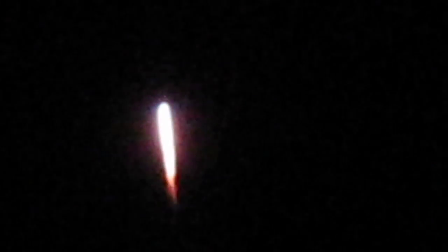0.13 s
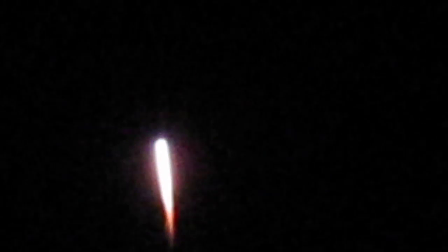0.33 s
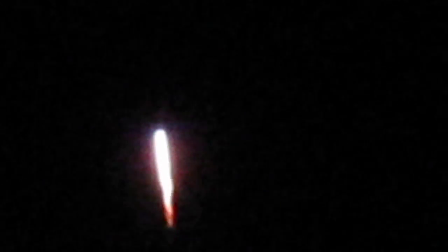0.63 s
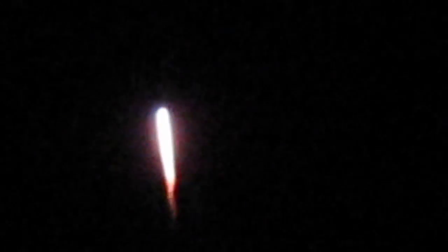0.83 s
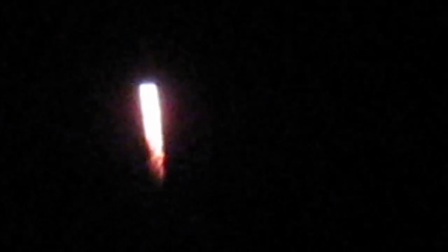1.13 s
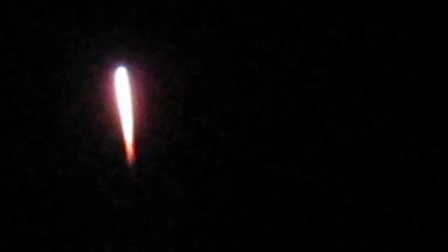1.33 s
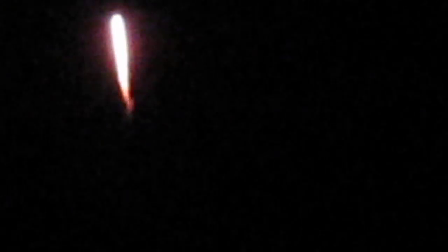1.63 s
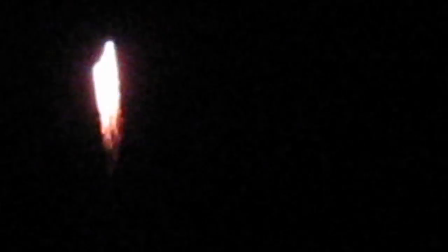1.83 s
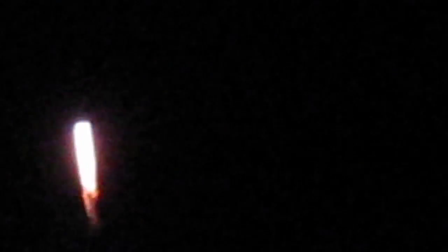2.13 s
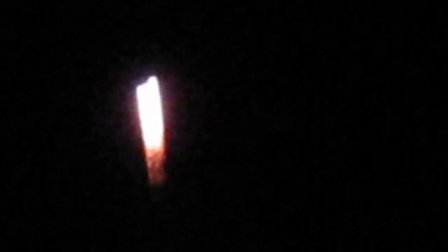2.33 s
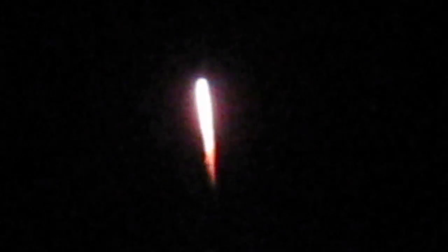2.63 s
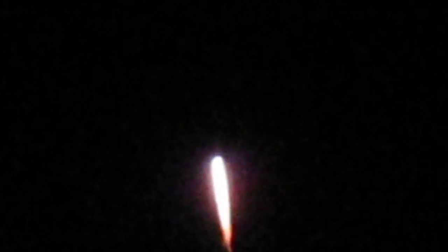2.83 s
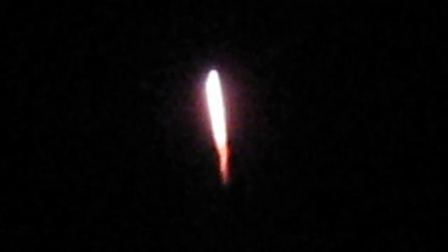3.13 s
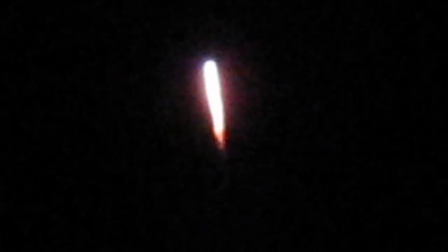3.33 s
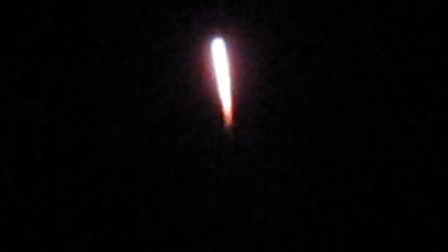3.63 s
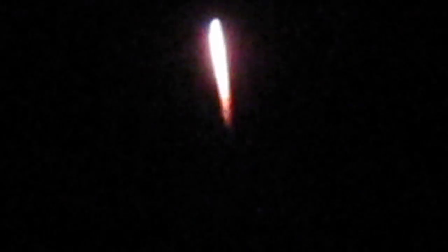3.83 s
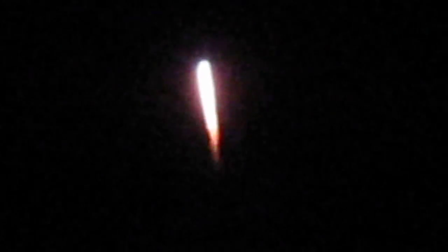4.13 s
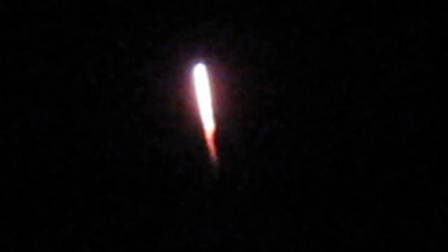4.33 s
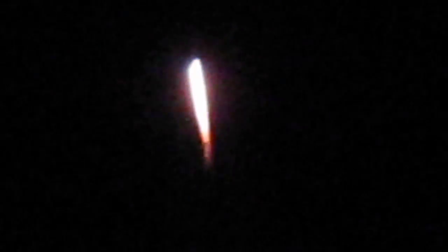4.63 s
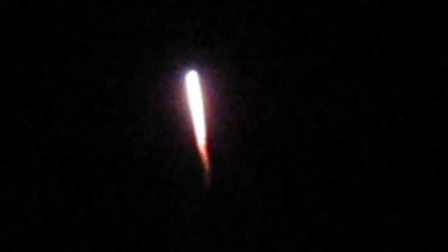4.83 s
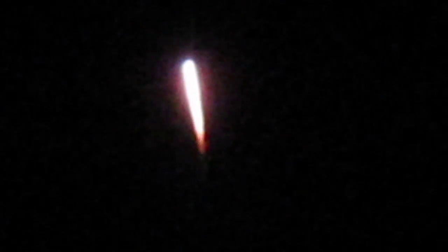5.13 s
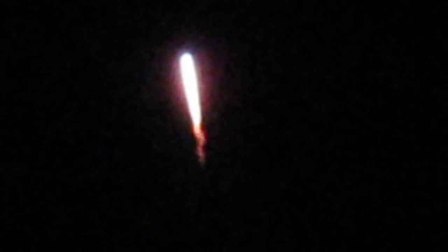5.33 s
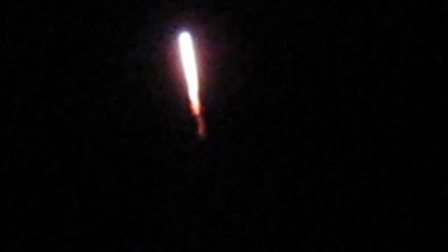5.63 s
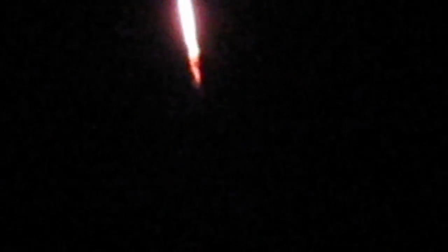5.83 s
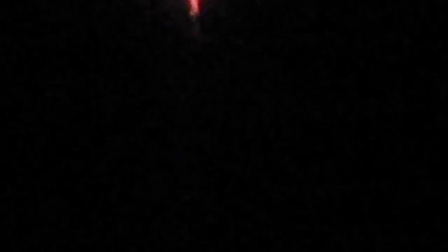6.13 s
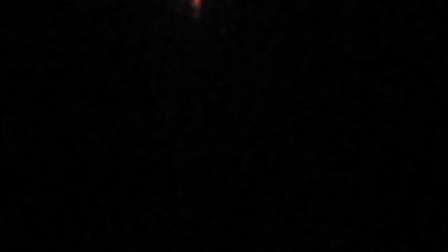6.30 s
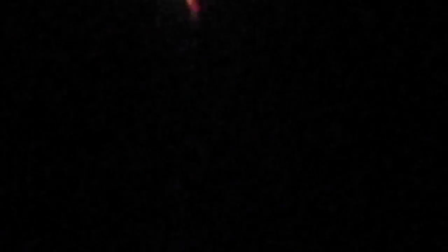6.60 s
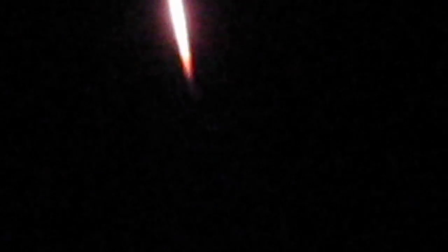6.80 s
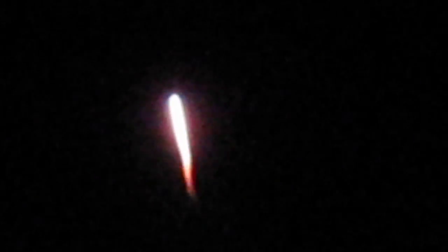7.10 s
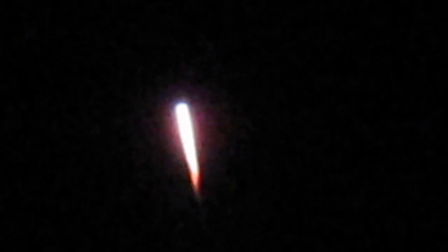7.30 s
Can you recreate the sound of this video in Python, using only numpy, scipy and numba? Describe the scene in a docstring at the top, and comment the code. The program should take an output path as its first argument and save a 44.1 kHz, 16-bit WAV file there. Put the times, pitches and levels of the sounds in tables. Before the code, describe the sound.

Distant rocket roar at night, starting as a low rumble, swelling into harsh, crackling, overloaded fluttering with hard cracks, then easing back to rumble.

```python
"""A far rocket climbs at night. At first a distant exhaust roar is heard with faint hiss, whine and soft rustles.
From 0.6 s surges of the swelling roar pin a small camera's input at its rails: the sound stalls for ms at a time.
From 1 s hard shock cracks join in; the roar is strongest near 3.4 s, and the last listed surge comes at 6.6 s.
The roar is shaped noise with listed surges and cracks; gain control and filters follow the overloaded input."""
import sys
import numpy as np
from scipy import signal
from scipy.fft import rfft, irfft, next_fast_len
from scipy.io import wavfile
from scipy.ndimage import uniform_filter1d
from numba import njit

SR = 44100
rng = np.random.default_rng(int(sys.argv[2]) if len(sys.argv) > 2 else 0)


def dump(signal):
    """Clip the signal to [-1, 1] and save it as 16-bit WAV at the path in sys.argv[1]."""
    limited = np.clip(np.atleast_2d(signal).T, -1, 1)
    pcm = np.round(limited * 32767).astype(np.int16)
    wavfile.write(sys.argv[1], SR, pcm)


N = 328986
T_S = np.arange(N) / SR

# Levels are dB re one rail at the input; a colour gives relative spectral density, scaled to rms 1 in noise().
# deep roar: t/s, level/dB
DEEP_LEVEL = [(0, -12.5), (0.6, -6.5), (1.199, -5.5), (1.45, -5), (1.8, -1), (2.1, -1), (2.602, 0.5),
              (3.4, 3), (3.9, 2.5), (4.3, 1.5), (4.8, 0), (5.101, -4), (5.6, -6), (5.9, -6), (6.25, -7),
              (6.45, -6), (6.9, -5.5), (7.46, 0)]
# colours of the three parts of the roar: f/Hz, level/dB (per Hz)
DEEP_COLOUR = [(8, -31.5), (14, -11.5), (22, -2.5), (32, 0.5), (45, -1.5), (64, -4), (85, -16), (120, -25)]
BODY_COLOUR = [(50, -28.5), (75, -3), (95, -1.5), (118, 4), (140, 1.5), (165, -0.5), (200, -1), (245, -11),
               (300, -45)]
UPPER_COLOUR = [(200, -35.5), (260, 1), (315, 3.5), (400, -3.5), (520, -5), (580, -18), (780, -20),
                (850, -29.5), (1100, -32.5), (1500, -55.5), (2200, -69.5)]
# fine shock crackle of the plume: t/s, level/dB
CRACKLE_LEVEL = [(0, -64.5), (1.2, -53), (1.8, -42), (2.6, -40), (3.9, -39), (4.6, -42), (5.15, -49.5),
                 (5.701, -53.5), (6.399, -61), (7.46, -62)]
# its colour, and that of the faint hiss of the night: f/Hz, level/dB (per Hz)
CRACKLE_COLOUR = [(400, -22), (700, -4.5), (1100, 1), (2000, -16), (4000, -25.5), (8000, -40),
                  (16000, -72.5)]
HISS_COLOUR = [(900, -35), (1500, -22.5), (2160, -13.5), (2800, -13), (3700, -13.5), (4600, -19.5),
               (5400, -20), (6300, -29), (12000, -33), (16000, -53)]
# thin fluttering bands in the night air: f/Hz, offset/Hz at which they are 30 dB down, relative level/dB
WHINE_BANDS = [(2830, 220, 2), (5460, 450, -11)]
# short soft rustles close by: t/s, time/s from the peak to 35 dB below it, level/dB
RUSTLES = [(0.004, 0.0098, -48), (0.096, 0.14, -67.5), (.24, 0.054, -64), (.37, 0.052, -65),
           (0.551, 0.029, -55), (0.727, 0.11, -58), (5.73, 0.19, -59.5), (5.86, 0.093, -62),
           (6.183, 0.11, -55.5), (6.841, 0.061, -57.5), (7.265, 0.069, -65.5)]
# their colour, with two narrow rings: f/Hz, level/dB (per Hz)
RUSTLE_COLOUR = [(1500, -19.5), (2500, -7.5), (2820, -3), (3100, -9.5), (5000, -16.5), (5500, -12.5),
                 (5900, -18), (12000, -28.5)]
# clearest pressure surges: start t/s, time at the rail/ms, steepness/(rails per ms) before edge scaling;
# a negative steepness marks the lower rail
SURGES = [(0.5943, 1.3, -0.55), (0.8377, 2.9, -0.75), (0.962, 3.6, -0.45), (0.9815, 0.9, 0.45),
          (1.0481, 3.0, -0.7), (1.1287, 2.7, -0.7), (1.1899, 1.6, 0.65), (1.3188, 3.9, 0.9),
          (1.3521, 1.7, 0.5), (1.3645, 1.0, -0.8), (1.4202, 1.4, -1.2), (1.4362, 1.4, -1.05),
          (1.4476, 3.3, 0.8), (1.4979, 7.0, 1.7), (1.5133, 7.4, -0.8), (1.538, 8.6, 0.5),
          (1.569, 2.4, -1.7), (1.6503, 5.9, 0.5), (1.6658, 2.9, -1.95), (1.7069, 3.6, -1.6),
          (1.7487, 8.0, -0.85), (1.7589, 2.8, 1.45), (1.7894, 7.6, 0.65), (1.8093, 13.7, -0.9),
          (1.861, 10.1, -2.6), (1.9529, 4.7, 1.05), (1.9608, 2.7, -2.4), (1.9654, 2.8, -1.55),
          (1.9861, 6.6, 2.5), (2.1003, 4.7, 0.85), (2.1227, 3.5, -1.85), (2.1703, 7.5, 0.95),
          (2.2348, 6.9, 0.85), (2.2528, 7.9, -1.3), (2.3007, 11.4, -2.0), (2.3177, 6.7, 0.75),
          (2.3769, 5.4, 0.85), (2.4118, 7.9, 0.6), (2.4302, 9.0, -1.25), (2.4498, 15.8, 1.65),
          (2.4926, 3.5, -1.15), (2.4971, 4.8, -0.3), (2.5131, 13.8, 0.3), (2.5327, 6.5, -0.45),
          (2.6257, 5.7, -1.2), (2.6344, 11.0, 1.45), (2.6512, 6.1, -0.7), (2.6702, 6.9, 2.3),
          (2.7141, 6.2, -0.6), (2.7361, 1.6, -1.6), (2.7912, 7.6, 0.5), (2.81, 12.9, -1.6),
          (2.8282, 11.8, 2.3), (2.8862, 10.6, 0.3), (2.9104, 8.3, -1.6), (2.9543, 7.3, 0.55),
          (2.9678, 11.1, -1.5), (2.9918, 9.8, 0.3), (3.0083, 6.1, -0.7), (3.0266, 7.4, -1.65),
          (3.0662, 3.3, 0.85), (3.078, 12.5, -1.45), (3.0921, 6.0, 1.05), (3.154, 7.7, -1.2),
          (3.163, 12.1, 2.0), (3.2091, 4.1, -0.3), (3.2182, 6.6, 1.85), (3.2376, 7.6, 0.8),
          (3.2547, 10.3, -0.6), (3.2729, 8.8, 0.65), (3.2979, 9.5, 1.35), (3.3091, 8.6, -1.8),
          (3.3238, 5.7, 0.65), (3.3718, 5.9, -0.5), (3.381, 12.0, 1.6), (3.4114, 14.2, -0.9),
          (3.4389, 8.1, 0.4), (3.5136, 5.2, -1.05), (3.521, 8.5, 1.35), (3.542, 2.8, -1.35),
          (3.5807, 9.9, 0.7), (3.6162, 5.6, -0.7), (3.6398, 8.1, 1.2), (3.6831, 6.6, -0.4),
          (3.6916, 4.9, 0.8), (3.699, 7.9, 1.25), (3.7142, 7.5, -0.8), (3.733, 7.0, 1.1),
          (3.7434, 7.7, -0.65), (3.7701, 2.0, -0.3), (3.8127, 13.6, -2.2), (3.8288, 8.7, 1.9),
          (3.9245, 6.9, 0.4), (3.9365, 8.8, -1.35), (3.9711, 6.3, -1.25), (4.0072, 2.9, -0.65),
          (4.0113, 9.2, 1.35), (4.0267, 8.0, -1.2), (4.0436, 5.5, -1.65), (4.167, 7.3, 0.3),
          (4.1781, 9.7, -1.1), (4.2055, 8.5, 0.6), (4.2196, 11.6, -0.5), (4.2529, 3.3, -2.0),
          (4.2587, 9.1, 0.5), (4.294, 5.7, 0.3), (4.309, 11.2, -1.05), (4.3244, 12.6, 1.1),
          (4.3814, 5.9, -0.3), (4.4689, 4.4, 0.85), (4.4753, 5.4, -1.15), (4.5254, 8.1, -0.85),
          (4.5517, 8.6, 0.3), (4.5942, 4.3, 0.65), (4.6046, 8.5, -0.6), (4.6744, 4.4, 0.55),
          (4.7024, 3.0, 0.8), (4.7138, 5.7, -0.6), (4.7286, 4.8, 0.75), (4.7883, 6.4, -1.2),
          (4.8603, 2.5, -0.9), (4.8913, 2.0, -1.25), (4.9055, 2.9, 0.7), (4.9101, 4.3, 0.3),
          (4.9211, 7.1, -0.65), (5.0178, 3.0, -0.9), (5.0369, 2.5, -0.5), (5.0646, 4.5, 0.5),
          (5.1699, 2.5, -0.95), (5.2015, 3.0, -0.9), (5.2268, 1.8, -0.7), (5.2464, 2.8, 0.5),
          (5.2821, 2.3, 0.8), (5.3321, 1.7, -0.9), (5.3467, 2.8, 0.8), (5.3854, 1.5, -0.85),
          (5.4081, 2.8, -0.3), (5.4339, 3.3, -0.9), (5.4559, 1.6, 0.4), (5.5076, 3.4, -0.7),
          (5.5334, 1.9, -0.5), (5.5602, 2.0, -0.4), (5.582, 2.9, -0.6), (5.6073, 3.2, -0.55),
          (5.653, 1.5, -0.6), (5.7351, 2.3, -0.6), (5.7564, 0.8, 0.35), (5.9087, 2.5, -0.3),
          (6.0041, 2.7, -0.45), (6.0242, 4.2, 0.45), (6.1024, 2.6, -0.45), (6.1226, 3.5, 0.9),
          (6.1356, 1.5, -0.35), (6.1545, 1.1, 0.35), (6.1752, 2.6, -0.3), (6.2136, 2.7, -0.3),
          (6.2233, 7.1, 0.35), (6.2393, 1.3, -0.5), (6.2883, 2.1, 0.35), (6.5972, 1.3, 0.25)]
# hardest shock cracks: t/s, level/dB
CRACKS = [(0.999, -29.5), (1.137, -23.5), (1.498, -11.5), (1.635, -28), (1.677, -22.5), (1.968, -6),
          (2.082, -18), (2.128, -14), (2.198, -19), (2.439, -9), (2.446, -12), (2.502, -9.5), (2.619, -14),
          (2.665, -17.5), (2.736, -14), (2.821, -6.5), (2.926, -15.5), (3.098, -19), (3.215, -22),
          (3.369, -14), (3.51, -16.5), (3.627, -20.5), (3.691, -20.5), (3.775, -16.5), (3.87, -23),
          (4.15, -20), (4.321, -2.5), (4.545, -20.5), (6.019, -40.5), (6.124, -34.5), (6.228, -36)]
# their colour: f/Hz, level/dB (per Hz)
CRACK_COLOUR = [(200, -4), (450, 2), (900, -3), (2000, -17), (3500, -27), (9000, -58)]

# body and upper roar: level at 0 dB swell (dB), share of the swell followed, loss in the climb (dB per s)
BODY_DB, BODY_SHARE, BODY_FADE_DB_S = -5, 0.67, 1
UPPER_DB, UPPER_SHARE, UPPER_FADE_DB_S = -13, 0.87, 1.69
# limits of the unlisted roar (rails): its deep part alone, and the whole when calm and at full swell
DEEP_MOST, CALM_MOST, FULL_MOST = 0.85, 0.95, 1.3
STEEPEN_MS = 0.34  # advance of crests at full swell, ms per rail
HISS_DB, WHINE_DB = -52, -68  # at the strongest crackle, before flicker; the whine also before its band levels
# surges: factor on steepness for rising pressure, on its root for falling; depth (rails) and blend (ms) of a ramp
RISING, FALLING, SWING, BLEND_MS = 1.29, 0.64, 1.9, 3.5
CRACK_RISE_S, CRACK_FALL_S = 0.003, 0.014  # time between the peak and 35 dB below it
RAIL_SAG, OVERSHOOT = 0.037, 2.2  # rails; greatest overshoot as a multiple of the sag
# gain control: target level and starting power (dB), firmness 0-1, time constants of the power (s)
HOLD_DB, START_DB, FIRMNESS, RISE_S, FALL_S = -10.8, -11.5, 0.95, 0.5, 0.8
BASS_CUT_HZ, SOFT_HZ, TOP_HZ = 200, 11000, 16300


def undb(db):
    """Amplitude ratio is ten to the power of the level over 20."""
    return 10 ** (np.asarray(db) / 20)


def noise(colour):
    """Spectral shaping: white noise is weighted by a colour, then scaled to rms 1."""
    hz, db = np.transpose(colour)
    size = next_fast_len(N)
    bins = np.arange(1, size // 2 + 2) * SR / size
    weight = undb(np.interp(np.log(bins), np.log(hz), db, -99, -99))
    shaped = irfft(rfft(rng.standard_normal(size)) * weight, size)[:N]
    return shaped / np.std(shaped)


def walk(rate_hz):
    """Random modulation: levels held for 1 / rate are smoothed twice and scaled to spread 1."""
    hold = int(SR / rate_hz)
    steps = np.repeat(rng.standard_normal(N)[:N // hold + 1], hold)
    smooth = uniform_filter1d(uniform_filter1d(steps, hold), hold)[:N]
    return smooth / np.std(smooth)


def puffs(times, lengths, levels_db, rise=None):
    """Superposition of Gaussian level bumps; with a rise time, the front half is that short."""
    total = np.zeros(N)
    for start, length, db in np.broadcast(times, lengths, levels_db):
        width = np.where(T_S < start, rise or length, length)
        total += undb(db) * np.exp(-4 * ((T_S - start) / width) ** 2)
    return total


def swell_db():
    """Source level: the deep roar's level is interpolated at every sample."""
    return np.interp(T_S, *np.transpose(DEEP_LEVEL))


def fullness():
    """Nonlinearity sets in with level: 0 when the swell is calm, 1 when it is full."""
    return np.interp(swell_db(), [-6, -1], [0, 1])


def rounded(x, most):
    """Soft saturation: small values pass almost unchanged, large ones bend over towards most."""
    return x / (1 + (x / most) ** 4) ** 0.25


def deep_roar():
    """Turbulent exhaust noise: its deepest part carries the swell, with softly limited peaks."""
    return rounded(undb(swell_db()) * noise(DEEP_COLOUR), DEEP_MOST)


def body_roar(waver):
    """Propagation through air makes the body waver, and the climb weakens it."""
    level_db = BODY_DB + BODY_SHARE * swell_db() - BODY_FADE_DB_S * T_S
    return undb(level_db + waver) * noise(BODY_COLOUR)


def upper_roar(waver):
    """Propagation makes the upper roar waver, more strongly at full swell, and it fades sooner than the body."""
    level_db = UPPER_DB + UPPER_SHARE * swell_db() - UPPER_FADE_DB_S * T_S
    waver_db = (1.2 + 2.1 * fullness()) * waver
    return undb(level_db + waver_db) * noise(UPPER_COLOUR)


def steepen(pressure):
    """Finite-amplitude propagation: crests outrun troughs and steepen the fronts."""
    advance_s = STEEPEN_MS / 1000 * fullness() * pressure
    return np.interp(T_S + advance_s, T_S, pressure)


def rumble(body_waver, upper_waver):
    """Superposition of the three parts, softly limited to leave the tallest peaks to the surges, then steepened."""
    most = CALM_MOST + fullness() * (FULL_MOST - CALM_MOST)
    return steepen(rounded(deep_roar() + body_roar(body_waver) + upper_roar(upper_waver), most))


def crackle_db():
    """Source level: the fine crackle's level is interpolated at every sample."""
    return np.interp(T_S, *np.transpose(CRACKLE_LEVEL))


def crackle(waver):
    """Shock noise of the plume: coloured noise with wavering level."""
    return undb(crackle_db() + 3.9 * waver) * noise(CRACKLE_COLOUR)


def stir_db():
    """Level coupling: the night sounds follow part of the crackle's level, relative to its maximum."""
    level_db = crackle_db()
    return 0.65 * (level_db - level_db.max())


def hiss(flicker):
    """Broadband noise whose level flickers and rises with the crackle."""
    return undb(HISS_DB + stir_db() + 1.2 * flicker) * noise(HISS_COLOUR)


def whine(flicker):
    """Narrow-band noise: two thin bands flutter together and rise with the crackle."""
    bands = np.zeros(N)
    for hz, width, db in WHINE_BANDS:
        bands += undb(db) * noise([(hz - width, -30), (hz, 0), (hz + width, -30)])
    return undb(WHINE_DB + 0.45 * stir_db() + 3 * flicker) * bands


def rustles():
    """Amplitude-modulated noise: short bumps shape noise with two narrow rings."""
    return puffs(*np.transpose(RUSTLES)) * noise(RUSTLE_COLOUR)


def surge(pressure):
    """Asymmetric wavefronts: pressure ramps to a rail, holds and ramps back, rising faster than it falls."""
    out = pressure.copy()
    margin = SR // 100
    for start, hold_ms, steep in SURGES:
        at = int(start * SR) + np.arange(-margin, int(hold_ms * SR / 1000) + margin)
        ms = (at / SR - start) * 1000
        away_ms = np.maximum(np.maximum(-ms, ms - hold_ms), 0)
        slope = np.where(steep * ms < 0, RISING * abs(steep), FALLING * np.sqrt(abs(steep)))
        # the hold lies just past the rail, so that the input sticks
        ramp = 1 + 1e-3 - SWING * np.tanh(slope * away_ms / SWING)
        share = np.cos(np.pi / 2 * np.minimum(away_ms / BLEND_MS, 1)) ** 2
        out[at] += share * (np.sign(steep) * ramp - out[at])
    return out


def cracks():
    """Shock transients: bright noise bursts rise fast and die more slowly."""
    times, levels_db = np.transpose(CRACKS)
    return puffs(times, CRACK_FALL_S, levels_db, CRACK_RISE_S) * noise(CRACK_COLOUR)


@njit
def latch(x, sag, overshoot):
    """Overload hysteresis: past a rail (+-1) the stage overshoots by its speed, sags and sticks until x falls."""
    y, stuck = x.copy(), False
    for i in range(1, len(x)):
        was_stuck = stuck
        threshold = 1 - sag if was_stuck else 1.0
        stuck = abs(x[i]) > threshold
        if stuck:
            y[i] = (1 - sag) * np.sign(x[i])
            if not was_stuck:
                y[i] += overshoot * sag * np.tanh((x[i] - x[i - 1]) / sag)
    return y


@njit
def follow(power, start, rise, fall):
    """First-order power averaging, with different speeds for rise and fall."""
    y, level = np.empty(len(power)), start
    for i in range(len(power)):
        level += (power[i] - level) * (rise if power[i] > level else fall)
        y[i] = level
    return y


def gain_control(x):
    """Automatic gain: amplification falls as the running mean power grows."""
    mean_power = uniform_filter1d(x ** 2, size=SR // 4)
    power = follow(mean_power, undb(2 * START_DB), 1 / (RISE_S * SR), 1 / (FALL_S * SR))
    return x * undb(HOLD_DB) * power ** (-FIRMNESS / 2)


def band_limit(x):
    """Linear filtering: a one-pole bass cut lets each stall die away within a few ms; two low-passes cut the top."""
    x = signal.lfilter([1, -1], [1, -np.exp(-2 * np.pi * BASS_CUT_HZ / SR)], x - x[0])
    x = signal.lfilter(*signal.butter(1, SOFT_HZ, fs=SR), x)
    return signal.sosfilt(signal.ellip(8, 0.2, 60, TOP_HZ, fs=SR, output="sos"), x)


def scene():
    """Superposition at the input: roar, crackle and night sounds, with the surges blended in."""
    body_waver, upper_waver, crackle_waver = walk(9), walk(35), walk(110)
    exhaust = rumble(body_waver, upper_waver)
    shocks = cracks()
    exhaust = exhaust + crackle(crackle_waver) + shocks
    hiss_flicker, whine_flicker = walk(20), walk(12)
    night = hiss(hiss_flicker) + whine(whine_flicker) + rustles()
    return surge(exhaust + night)[None]


def record(dry):
    """Signal chain: the input sticks at its rails, gain control levels it, then bass and top are cut."""
    return band_limit(gain_control(latch(dry[0], RAIL_SAG, OVERSHOOT)))[None]


dry = scene()
out = record(dry)
dump(out)
```